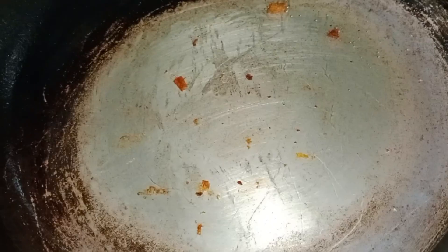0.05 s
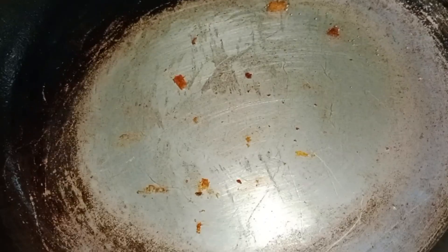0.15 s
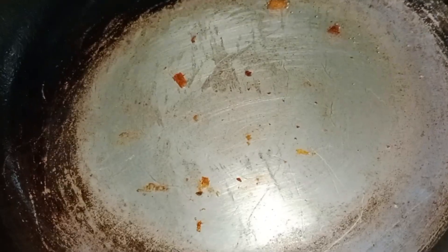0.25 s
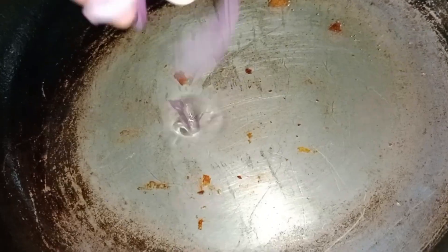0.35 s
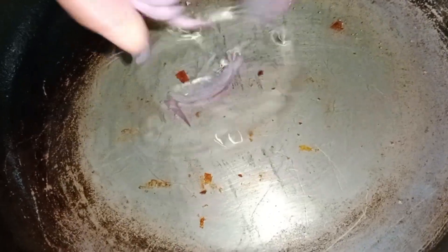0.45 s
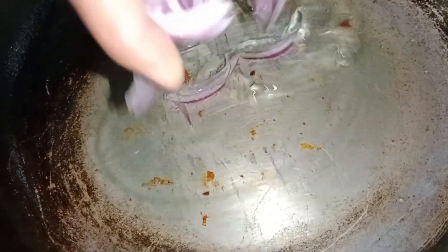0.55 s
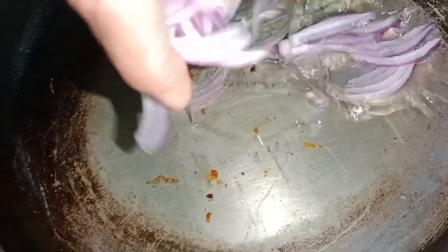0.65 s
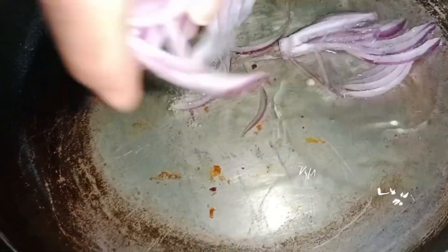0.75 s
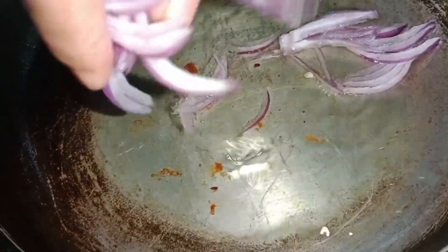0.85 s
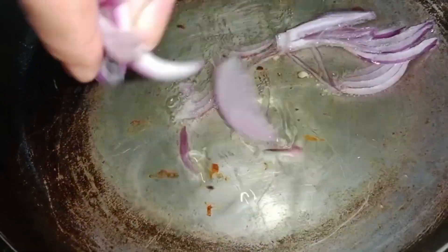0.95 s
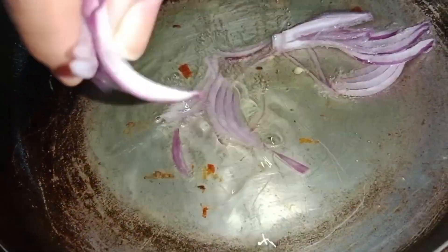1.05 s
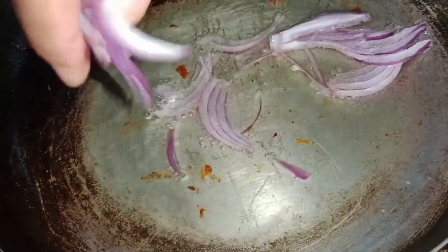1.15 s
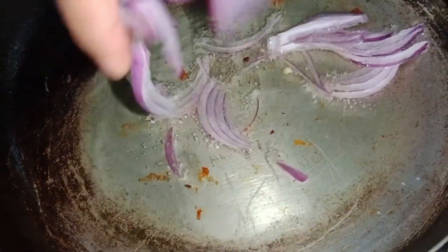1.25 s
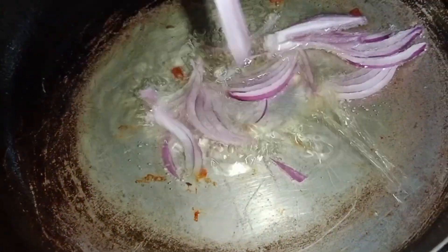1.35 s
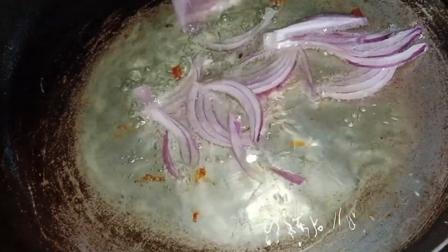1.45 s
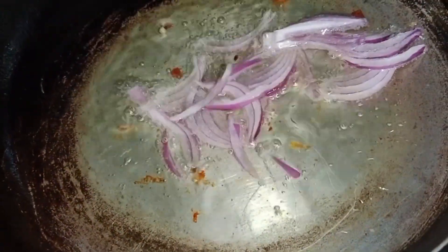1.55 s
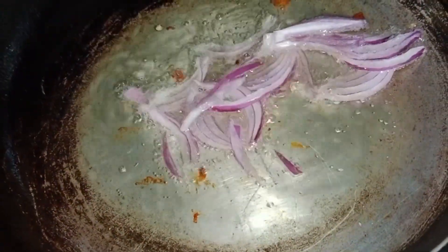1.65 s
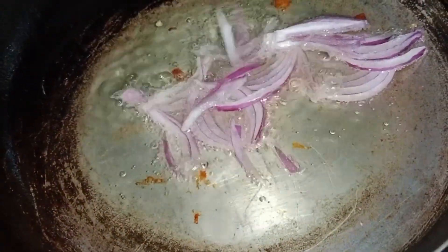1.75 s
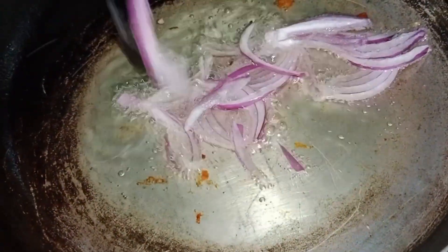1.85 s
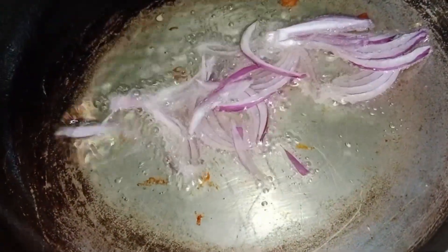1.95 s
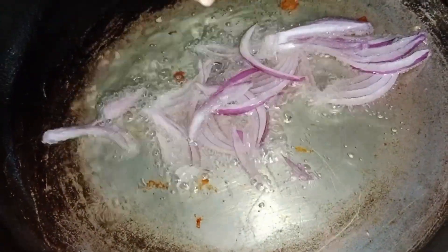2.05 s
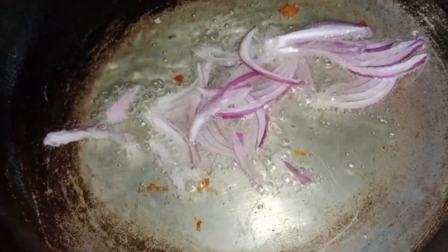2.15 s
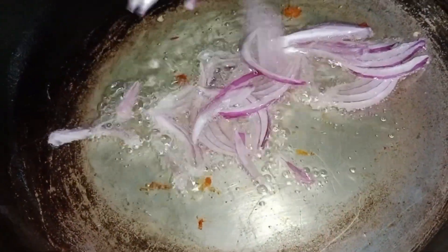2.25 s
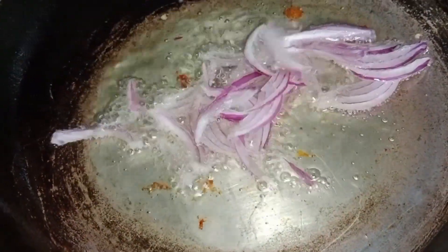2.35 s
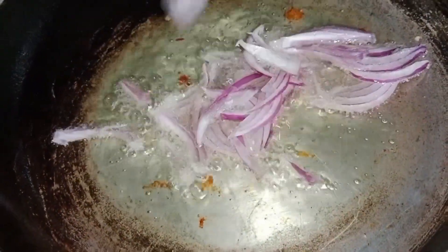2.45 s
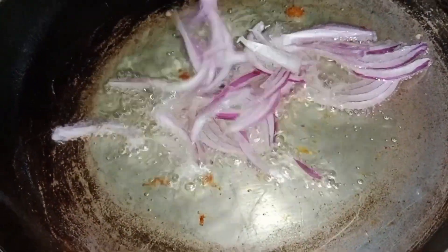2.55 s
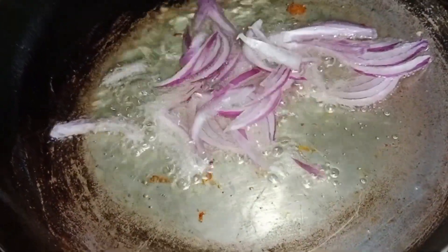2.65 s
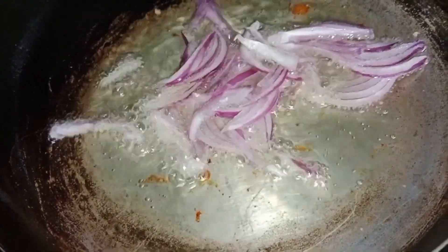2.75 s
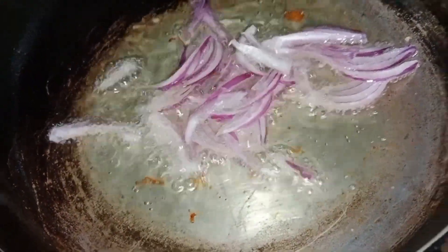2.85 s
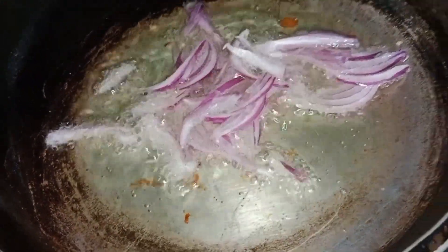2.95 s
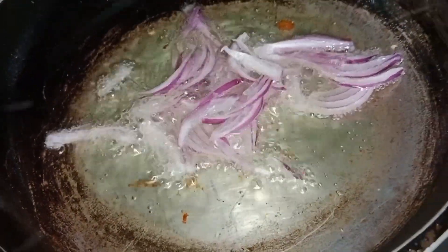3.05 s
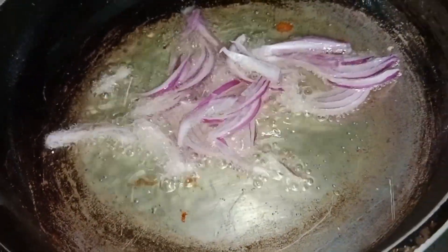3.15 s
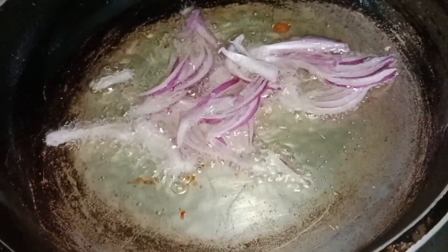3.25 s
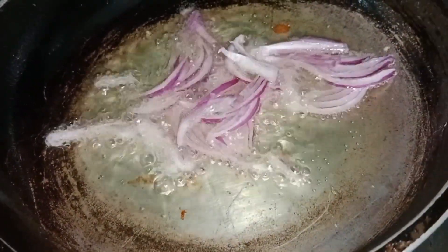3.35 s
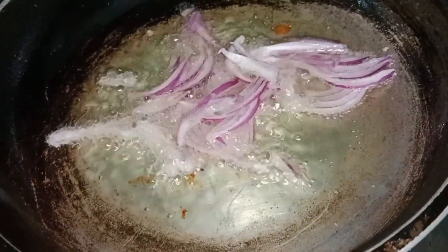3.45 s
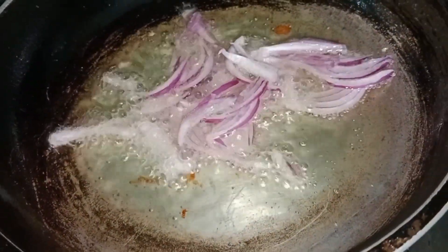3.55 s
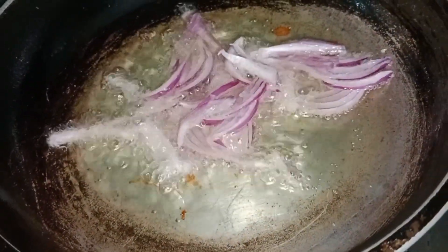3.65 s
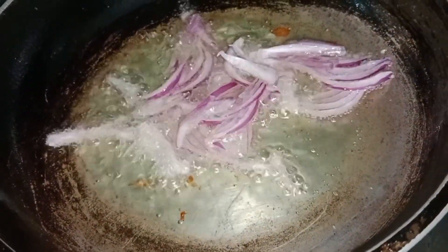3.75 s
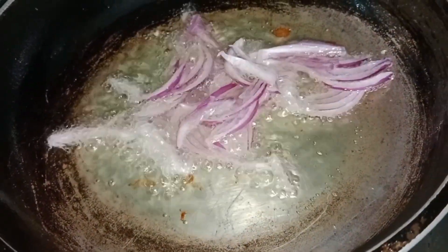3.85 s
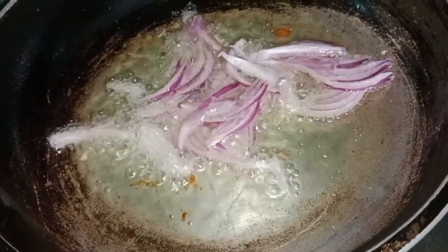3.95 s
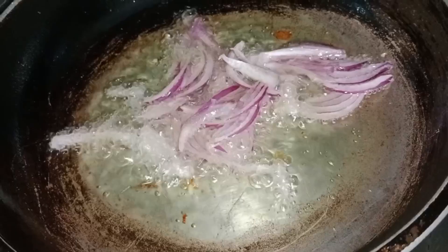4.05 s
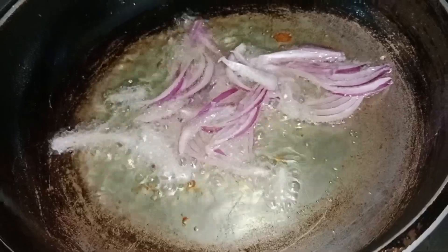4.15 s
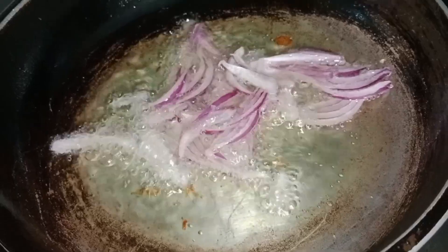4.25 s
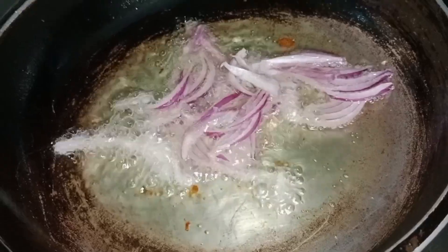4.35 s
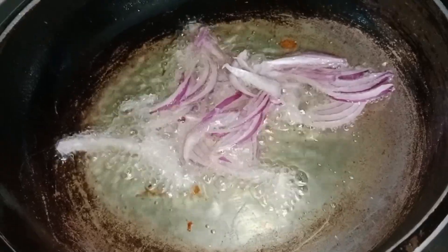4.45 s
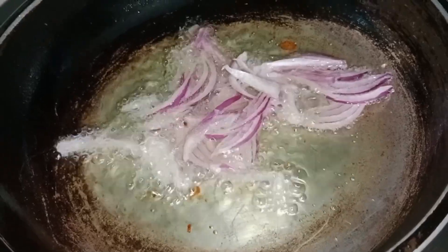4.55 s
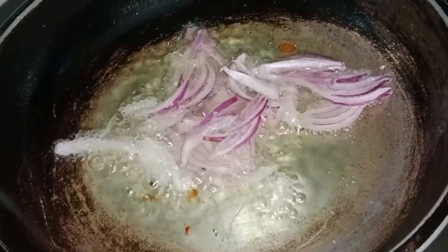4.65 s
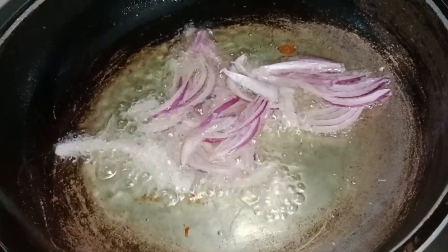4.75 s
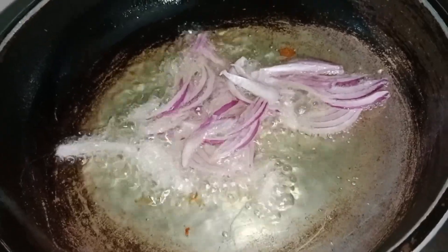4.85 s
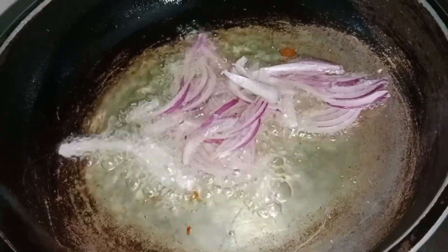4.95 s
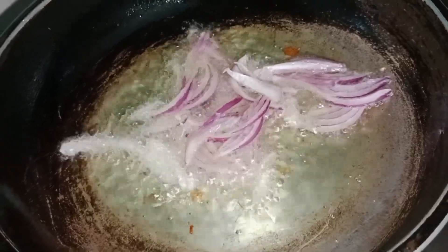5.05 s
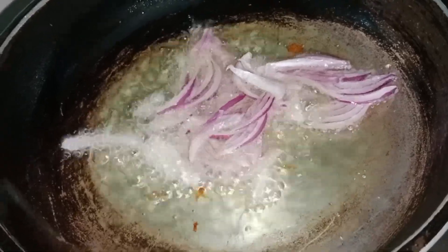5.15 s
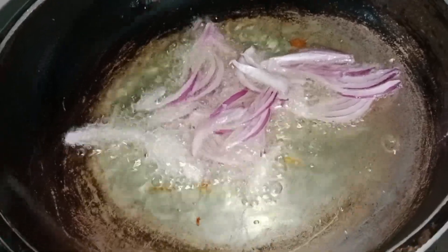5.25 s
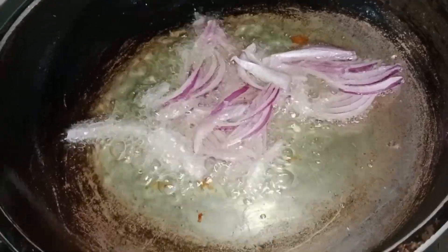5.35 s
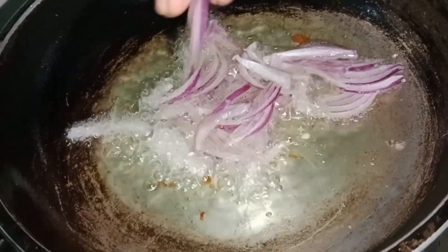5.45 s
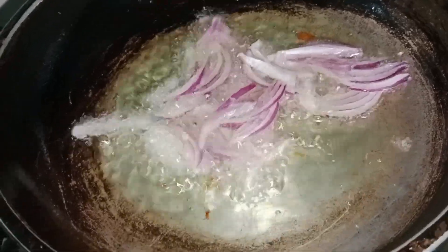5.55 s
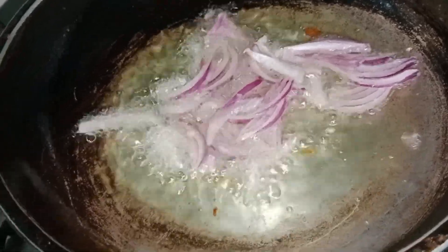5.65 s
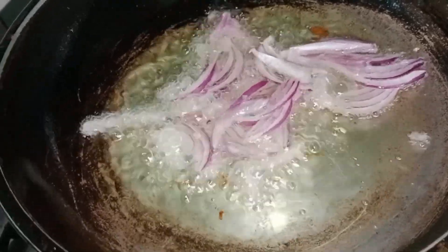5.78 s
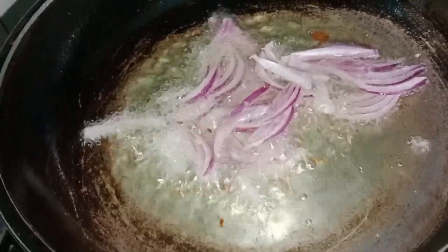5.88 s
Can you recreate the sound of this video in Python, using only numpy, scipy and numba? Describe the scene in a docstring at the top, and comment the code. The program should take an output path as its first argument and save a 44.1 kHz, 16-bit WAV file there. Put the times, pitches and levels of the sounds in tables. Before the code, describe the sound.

After a near-silent start, onion slices hit hot oil and fry with crisp hissing, close snapping pops and faint low bumps.

```python
"""Onions into hot oil

Sliced onions are dropped into hot oil in a wide pan, just under a phone in a small kitchen.
Steam bubbles of three sizes burst in a dense sizzle of short decaying sines; single big ones pop or gurgle.
The hollow of the pan and the hob scatter each burst into a short tail of fading noise.
Low bumps, a rumble, a faint wavering tone and room hiss, all shaped from noise and a low sine, lie beneath."""
import sys
import numpy as np
from scipy import signal
from scipy.fft import rfft, irfft
from scipy.io import wavfile
from scipy.ndimage import uniform_filter1d
from numba import njit

SR = 44100
rng = np.random.default_rng(int(sys.argv[2]) if len(sys.argv) > 2 else 0)


def unload_wav(signal):
    """Save mono or channel-first audio to the path in sys.argv[1] as 16-bit WAV at rate SR, clipped to [-1, 1]."""
    wavfile.write(
        sys.argv[1],
        SR,
        np.round(np.clip(np.atleast_2d(signal).T, -1, 1) * 32767).astype(np.int16),
    )


N = 260895
SIZE = 8192  # samples in one burst with its tail


def amp(db):
    """Decibels to an amplitude factor."""
    return 10 ** (np.asarray(db) / 20)


def unit(x):
    """Scales a signal to an rms of 1."""
    return x / np.sqrt(np.mean(x ** 2))


def curve(rows):
    """Columns of a time table, one value a sample."""
    s, *columns = np.transpose(rows)
    return [np.interp(np.arange(N) / SR, s, c) for c in columns]


def shape_db(points, hz):
    """A spectrum of (Hz, dB) points read on a log-frequency axis."""
    f, db = np.transpose(points)
    return np.interp(np.log(np.maximum(hz, 1)), np.log(f), db)


def band_noise(centre_hz, width_hz):
    """Noise through one resonance twice, for steep skirts."""
    b, a = signal.iirpeak(centre_hz, centre_hz / width_hz, fs=SR)
    once = signal.lfilter(b, a, rng.standard_normal(N))
    return unit(signal.lfilter(b, a, once))


def walk(rate):
    """A random level that glides to a new value `rate` times a second; spread 1."""
    k = int(SR / rate)
    steps = np.repeat(rng.standard_normal(N // k + 1), k)
    return unit(uniform_filter1d(steps, k)[:N])


def humps(rows, length_s):
    """Bell-shaped swells, one a row, each peaking at its middle and level."""
    t = np.arange(N) / SR
    return [amp(db) * np.exp(-((t - s) / length) ** 2) for (s, db), length in zip(rows, length_s)]


@njit
def ring(out, at, hz, cycles, size):
    """Each burst is a sine that swells softly and dies away over a few cycles."""
    for k in range(len(at)):
        fall = np.exp(-np.pi * hz[k] / SR / cycles[k])
        turn = fall * np.exp(2j * np.pi * hz[k] / SR)
        z, swell, i = size[k] + 0j, 1., at[k]
        while i < len(out) and abs(z) > size[k] / 300:
            out[i] += z.imag * (1 - swell) ** 2
            z, swell, i = z * turn, swell * fall ** 3, i + 1
    return out


def add(out, s, sound, db):
    """Lays a sound into the track at its time and peak level."""
    start = int(s * SR)
    out[start:start + SIZE] += sound * amp(db) / np.abs(sound).max()


# The still air of the kitchen. Each row: frequency in Hz, spectral density in relative dB.
ROOM_SPECTRUM = [(180, -2), (300, -15), (425, 2.5), (656, -25.5), (820, -7), (1640, -16), (2300, -17.5),
                 (2930, -9), (5100, -36), (6740, -18.5), (8220, -12), (9550, -34)]
HISS_DB = -72


def room_hiss():
    """Steady noise with the room's spectrum; its level drifts slowly."""
    hz = np.arange(N // 2 + 1) * SR / N
    spectrum = rfft(rng.standard_normal(N)) * amp(shape_db(ROOM_SPECTRUM, hz))
    return unit(irfft(spectrum, N)) * amp(HISS_DB + 1.0 * walk(2.18))


# The faint tone, as it comes and goes. Each row: middle in seconds, level in dB,
# length in seconds from the middle to 1/e of the level.
WHISTLES = [(0.611, -68, 0.034), (0.807, -57.5, 0.027), (1.845, -59, 0.034), (2.731, -59.5, 0.04),
            (2.922, -55, 0.059)]
WHISTLE_HZ, WHISTLE_WIDTH_HZ = 417, 24


def whistle():
    """A narrow band of noise, heard as a wavering tone, let through in short swells."""
    swells = humps([(s, db) for s, db, _ in WHISTLES], [length for _, _, length in WHISTLES])
    return sum(swells) * band_noise(WHISTLE_HZ, WHISTLE_WIDTH_HZ)


# The broad part of the rumble. Each row: time in seconds, level in dB.
ROAR_LEVEL = [(0, -79), (2, -67), (5.92, -64)]


def roar():
    """Broad low noise that follows the level curve and flutters a little."""
    return band_noise(137, 346) * amp(curve(ROAR_LEVEL)[0] + 1.67 * walk(4.6))


# Low bumps that run together into a rumble. Each row: middle in seconds, level in dB.
LOW_BUMPS = [(.36, -67), (.55, -59), (.68, -61), (.92, -56.5), (1.23, -56.5), (1.48, -57.5), (1.6, -53),
             (1.74, -49.5), (1.92, -50), (2.06, -48), (2.13, -46), (2.21, -47.5), (2.301, -47),
             (2.55, -52.5), (2.75, -46.5), (2.87, -49), (3.0, -53), (3.32, -57), (3.45, -58), (3.73, -51.5),
             (4.2, -52), (4.87, -51), (5.36, -60), (5.529, -45), (5.63, -50), (5.92, -46)]
BUMP_S, BUMP_HZ = 0.047, 90.0  # half length to 1/e; mean pitch
BETWEEN_DB = -67  # middle level of the small bumps between


def bumps():
    """A low sine of unsteady pitch, roughened with low noise, swells at each bump; powers add."""
    swell = np.sqrt(sum(hump ** 2 for hump in humps(LOW_BUMPS, [BUMP_S] * len(LOW_BUMPS))))
    pitch_hz = BUMP_HZ * (1 + 0.1107 * walk(14))
    body = np.sin(2 * np.pi * np.cumsum(pitch_hz) / SR)
    rough = 0.33 * band_noise(101.6, 39.5) + 0.033 * band_noise(23, 50)
    between = amp(BETWEEN_DB + 3.5 * walk(12)) * band_noise(95.6, 55)
    return swell * unit(body + rough) + between


# Scatter after a burst, from the pan and then the kitchen.
# Each row: time to fall 60 dB in seconds, relative level in dB.
TAILS = [(0.043, -9), (0.161, -16.5)]


def scatter(count):
    """Spectra of the dying echoes on the way from a spot in the oil to the phone."""
    t = np.arange(SIZE) / SR
    onset = np.clip(t / 0.00084 - .5, 0, 1)  # the first echoes arrive just after the direct sound
    fade = onset * sum(amp(db - 60 * t / t60) for t60, db in TAILS)
    return rfft(0.21 * fade * rng.standard_normal((count, SIZE)))


# Overall tone colour of the bursts, with a deep notch near 4.9 kHz and little above 15.7 kHz.
# Each row: frequency in Hz, gain in dB.
BURST_TONE = [(120, -96), (430, -14.5), (700, -24.5), (2000, -11), (2700, -3), (3500, 7.5), (4300, -4),
              (4650, -20), (4870, -34), (5100, -14), (5400, -7.5), (7200, 4.5), (9000, -4), (11400, -12.5),
              (15400, -13), (15750, -41)]
# Air modes over the pan, before the shift from spot to spot. Each row: frequency in Hz, width in Hz, lift in dB.
PAN_MODES = [(770, 130, 15), (1293, 68, 12.5), (1693, 140, 10), (2416, 80, 10.5), (2808, 32, 8)]


def colour(shift=1):
    """Causal (minimum-phase) response of the pan hollow and the overall tone colour."""
    hz = np.arange(SIZE // 2 + 1) * SR / SIZE
    db = shape_db(BURST_TONE, hz)
    for mode_hz, width_hz, lift_db in PAN_MODES:
        db = db + lift_db / (1 + (2 * (hz - mode_hz * shift) / width_hz) ** 2)
    # folding the cepstrum forward in time makes the response causal
    cepstrum = irfft(np.log(amp(db)))
    cepstrum[1:SIZE // 2] *= 2
    cepstrum[SIZE // 2 + 1:] = 0
    return np.exp(rfft(cepstrum))


SPOT_SHIFT = 0.018  # spread of the air modes from spot to spot, as a share of their pitch


def paths(count):
    """Direct sound plus echoes, coloured by the pan hollow, which rings differently from each spot."""
    colours = [colour(1 + SPOT_SHIFT * c) for c in rng.standard_normal(count)]
    return (1 + scatter(count)) * colours


# Lone large bubbles under the slices. Each row: start in seconds, peak level in dB, pitch in Hz.
GURGLE_EVENTS = [(1.09, -61, 2400), (1.245, -46, 2780), (2.645, -51, 1160), (2.71, -50.5, 1700),
                 (2.798, -53, 1710), (4.99, -49, 1665), (5.126, -52.5, 1314), (5.352, -60, 1740),
                 (5.535, -55, 1667), (5.79, -55, 824)]
GURGLE_S, GURGLE_CYCLES = .03, 25.0  # span of the wobbles; cycles each one rings
RING_WET = 0.48  # share of scatter on a gurgle and on a pop's ring


def gurgles():
    """A large bubble wobbles a few times at nearly one pitch."""
    out = np.zeros(N + SIZE)
    for (s, db, hz), echo in zip(GURGLE_EVENTS, scatter(count=len(GURGLE_EVENTS))):
        when, detune = rng.random((2, 6))
        at = (GURGLE_S * when ** 2 * SR).astype(np.int64)
        pitch_hz = hz * (1 + 0.055 * (detune - .5))
        wobble = ring(np.zeros(SIZE), at, pitch_hz, np.full(6, GURGLE_CYCLES), np.ones(6))
        add(out, s, irfft(rfft(wobble) * (1 + RING_WET * echo)), db)
    return out[:N]


# Water pockets bursting low and wet. Each row: start in seconds, peak level in dB, lowest pitch in Hz,
# time for the swarm to fall 60 dB in seconds.
GULP_EVENTS = [(0.688, -42, 2150, 0.13), (0.92, -39, 3200, 0.013), (1.341, -43, 1520, 0.13),
               (1.8822, -31, 1170, 0.12), (2.3513, -27.5, 1450, 0.056), (2.609, -35.5, 1220, 0.18),
               (2.8841, -32, 1350, 0.045), (3.0408, -21.5, 910, 0.02), (3.074, -37.5, 620, 0.12),
               (3.6764, -29, 810, 0.0153)]


def gulps():
    """A large bubble breaks into a dying swarm of smaller ones, so the pitch climbs."""
    out = np.zeros(N + SIZE)
    for (s, db, hz, t60), way in zip(GULP_EVENTS, paths(count=len(GULP_EVENTS))):
        when, small = rng.random((2, 150))
        late = t60 * when ** 2.8  # crowded towards the start
        pitch_hz = hz * 2.4 ** small * (1 + 1.3 * late)
        size = amp(-60 * late / t60)
        swarm = ring(np.zeros(SIZE), (late * SR).astype(np.int64), pitch_hz, np.full(len(late), 3.5), size)
        add(out, s, irfft(rfft(swarm) * way), db)
    return out[:N]


# Single pops close under the phone. Each row: start in seconds, peak level in dB, bubble pitch in Hz,
# treble of the crack against the ring in dB.
POP_EVENTS = [(0.682, -25, 7350, -22.5), (0.7801, -27, 7970, -18), (0.8901, -23.5, 8520, -30),
              (0.9369, -23, 8100, -21.5), (1.2545, -22.5, 7200, -38.5), (1.3196, -30, 7200, -47.5),
              (1.3418, -30, 2280, -19.5), (1.38, -19, 8500, -22), (1.3954, -16, 7540, 8),
              (1.4705, -20, 3770, -19.5), (1.6865, -20, 8250, 0), (1.8295, -26.5, 7870, -46.5),
              (1.8528, -23, 3420, -14.5), (1.8808, -16.5, 2920, -13), (1.9007, -16, 6520, -23.5),
              (2.0368, -18.5, 8100, -11), (2.3222, -25, 5880, -44.5), (2.3507, -20.5, 3730, -16),
              (2.6093, -26, 3000, -21), (2.743, -20, 7240, -34), (2.884, -26, 3150, -10.5),
              (2.934, -21.5, 3280, -6.5), (2.9653, -18, 7700, -14), (3.0411, -10.5, 3684, -9.5),
              (3.1401, -19.5, 4100, -23.5), (3.1516, -21, 9700, -13.5), (3.325, -22.5, 3560, -32.5),
              (3.4038, -24, 6430, -21.5), (3.461, -23.5, 7000, -1), (3.6306, -27, 2890, -33.5),
              (3.6782, -3.5, 5970, -21), (3.939, -26, 5230, -38.5), (4.024, -24.5, 2920, -16),
              (4.085, -22.5, 3750, -16), (4.1836, -21.5, 6130, -16.5), (4.265, -27, 6530, -42),
              (4.3254, -25, 6900, -26), (4.361, -28, 4590, -45), (4.5785, -27, 4520, -34),
              (4.6183, -21, 5820, -40), (4.6943, -25, 7200, -12.5), (4.714, -28.5, 5400, -42.5),
              (4.753, -26, 5350, -42.5), (4.9427, -22.5, 7270, -33.5), (4.9584, -20.5, 6370, -37.5),
              (4.9791, -11.5, 2974, -47.5), (5.09, -21.5, 6800, -26.5), (5.1, -19, 3450, -35),
              (5.1886, -26.5, 9400, -43), (5.241, -26.5, 2985, -35), (5.251, -18.5, 7060, -43),
              (5.325, -23, 7040, 18), (5.544, -18, 8300, -1), (5.5779, -21, 6230, -55),
              (5.7139, -23.5, 8000, -12), (5.738, -23, 3670, -25), (5.7946, -22, 6670, -9.5)]
# cycles rung when crack and ring are equal; each such step of weaker crack doubles them
POP_CYCLES, CRACK_HALVES_DB = 1.18, 14.5
# a pop tears into a few bubbles over this many ring lengths and this share of pitch
SPLIT_RINGS, SPLIT_SPREAD = 3.0, 0.086
# the crack's share of scatter, larger than the ring's; the Hz above which the crack's level is set
CRACK_WET, TREBLE_HZ = .75, 10000


def pops():
    """Big bubbles: a ring at their own pitch plus a thin crack as the skin tears, each from its own spot."""
    out, tint = np.zeros(N + SIZE), colour()
    tear = rfft([1, -.95], SIZE) * tint  # a click with little bass
    treble = np.arange(len(tear)) * SR / SIZE > TREBLE_HZ
    tear /= np.abs(irfft(tear * treble)).max()
    for (s, db, hz, crack_db), echo in zip(POP_EVENTS, scatter(count=len(POP_EVENTS))):
        cycles = POP_CYCLES * 2 ** (-crack_db / CRACK_HALVES_DB)
        # the first of four bubbles starts at once, at the listed pitch
        late, detune = rng.random((2, 4)) * (np.arange(4) > 0)
        at = (SPLIT_RINGS * cycles / hz * SR * late).astype(np.int64)
        pitch_hz = hz * (1 + SPLIT_SPREAD * np.sin(2 * np.pi * detune))
        body = ring(np.zeros(SIZE), at, pitch_hz, np.full(4, max(cycles, .6)), amp(-5 * late))
        body = irfft(rfft(body) * tint * (1 + RING_WET * echo))
        crack = irfft(tear * (1 + CRACK_WET * echo))
        add(out, s, body / np.abs(body).max() + amp(crack_db) * crack, db)
    return out[:N]


# Slices landing in the oil or sinking deeper; each lot adds its boiling to what is there.
# Each row: start in seconds, fine, middle and coarse bubbles in dB, first flare against those levels in dB.
LANDINGS = [(0.429, -55.5, -68, -93, 0.5), (.68, -54, -58.5, -73.5, 2.5), (.86, -54.5, -57.5, -75, 7),
            (1.342, -46, -49, -58, 8.5), (1.83, -55, -50, -59, 6), (2.35, -42.5, -74, -62.5, -2.5),
            (2.75, -60, -73, -56.5, 3), (4.8, -51.5, -50, -61, 6), (5.55, -42.5, -45, -60, -3.5)]
# How fine, middle and coarse bubbles answer a landing.
# Each row: swell time in seconds, time the flare takes to die away in seconds, drying out in dB per second.
BUBBLE_ANSWER = [(0.019, 0.27, 1.13), (0.043, 0.13, 0.79), (0.022, 0.032, 6)]


def boiling():
    """Level of each bubble kind: every landing swells, flares briefly, then slowly dries out; powers add."""
    t = np.arange(0, N / SR, .002)
    swell_s, flare_s, dry_db = np.transpose(BUBBLE_ANSWER)[:, :, None]
    power = 0
    for s, *levels_db, flare_db in LANDINGS:
        since = np.maximum(t - s, 0)
        flare = flare_db * np.exp(-(since / flare_s) ** 2)
        db = np.array(levels_db)[:, None] + flare - dry_db * since
        swell = 1 - np.exp(-since / swell_s)
        power = power + (swell * amp(db)) ** 2
    return [np.interp(np.arange(N) / SR, t, gain) for gain in np.sqrt(power)]


# Fine, middle and coarse steam bubbles across the pan. Each row: lowest pitch in Hz, highest pitch in Hz,
# bursts per second, middle number of cycles rung, size scatter in dB, spread of the flurries in dB.
BUBBLE_KINDS = [(4840, 18500, 16500, 5.1, 5.5, 1.5), (2367, 4370, 3000, 10.1, 3, 2.5),
                (888, 2850, 1000, 5.7, 2, 4)]
# until the oil is crowded the largest bubbles are missing: each kind starts this much higher
CROWDED_S, SPARSE_RISE = 1.34, 1.16


def sizzle():
    """Dense random bursts; each spot in the oil has its own range of sizes and its own flurries."""
    out = np.zeros(N)
    together_db = 0.83 * walk(24.996)  # spits that stir all sizes at once
    ways = irfft(paths(count=5))
    for (low_hz, high_hz, rate, cycles, scatter_db, flurry_db), gain in zip(BUBBLE_KINDS, boiling()):
        kind = 0
        count = int(rate * N / SR / len(ways))
        for spot, way in enumerate(ways):
            when, place, big, long = rng.random((4, count))
            low = low_hz * np.where(when * N / SR < CROWDED_S, SPARSE_RISE, 1)
            hz = low * (high_hz / low) ** ((spot + 2 * place) / (len(ways) + 1))
            size = amp(-scatter_db * np.log(1 - .998 * big))  # a few are far louder than most
            at = (when * N).astype(np.int64)
            bursts = ring(np.zeros(N), at, hz, cycles * 2.4 ** (long - .5), size)
            stir_db = flurry_db * walk(18) + together_db + 1.45 * walk(3.0)
            kind = kind + signal.oaconvolve(bursts * amp(stir_db), way)[:N]
        out += unit(kind) * gain
    return out


def scene():
    """One microphone feeds both channels."""
    kitchen = room_hiss() + whistle() + roar() + bumps()
    mono = kitchen + gurgles() + gulps() + pops() + sizzle()
    return np.array([mono, mono])


TOP_HZ = 16850


def record(dry):
    """A steep low-pass ends the sound at TOP_HZ."""
    low_pass = signal.ellip(10, .2, 60, TOP_HZ, fs=SR, output="sos")
    return signal.sosfilt(low_pass, dry)


dry = scene()
out = record(dry)
unload_wav(out)
```